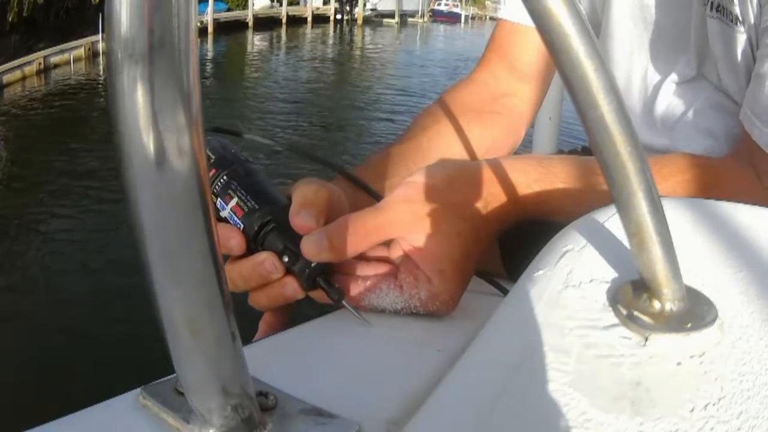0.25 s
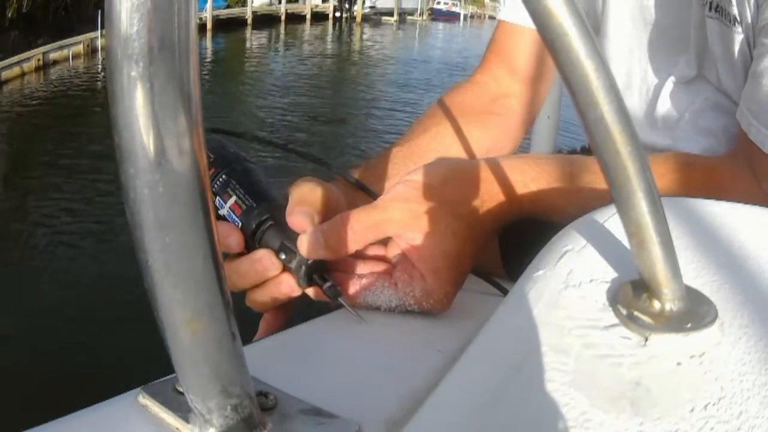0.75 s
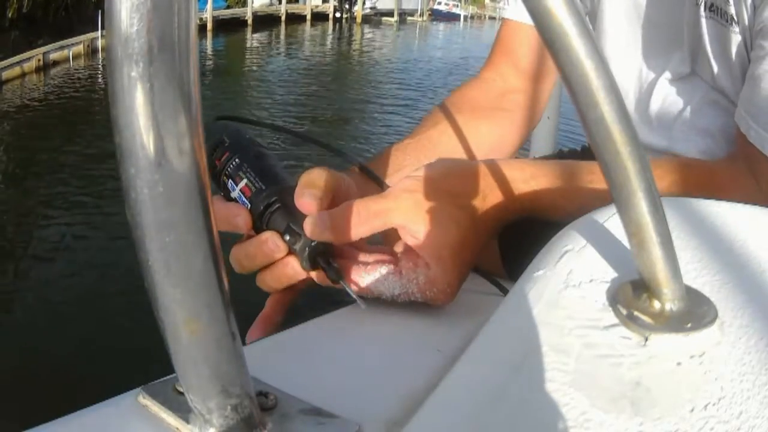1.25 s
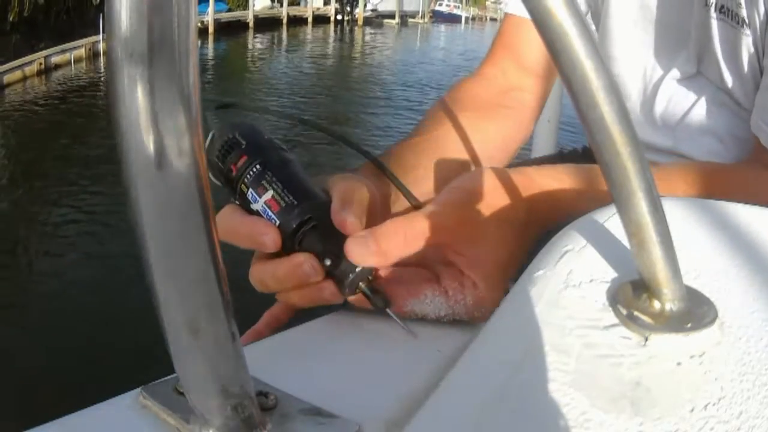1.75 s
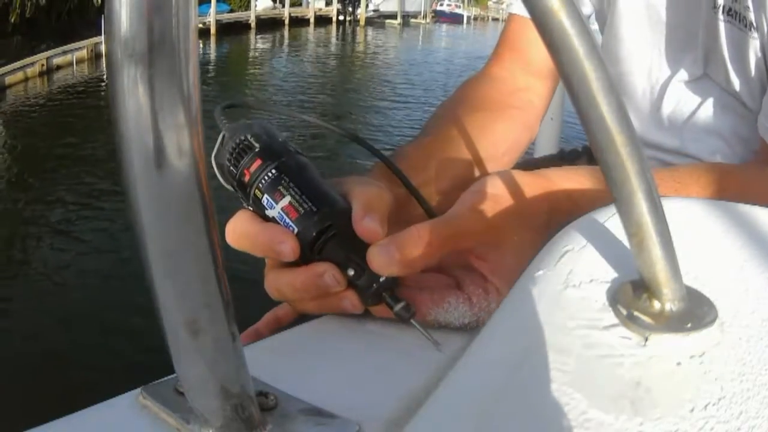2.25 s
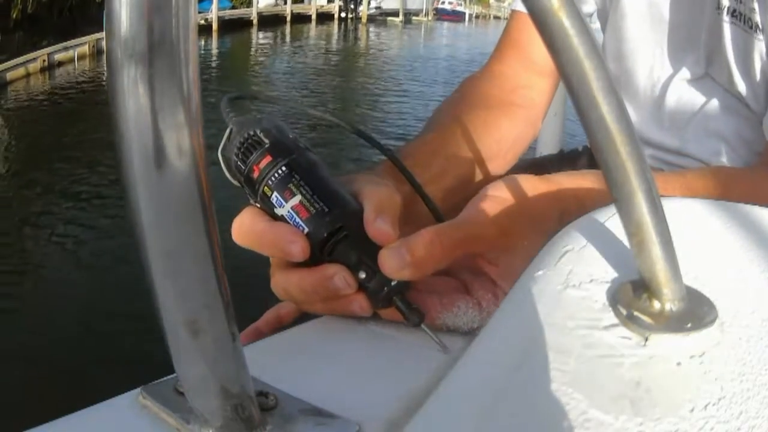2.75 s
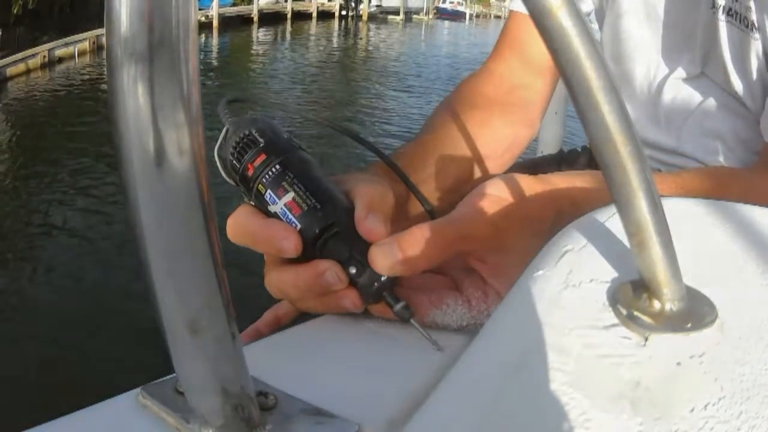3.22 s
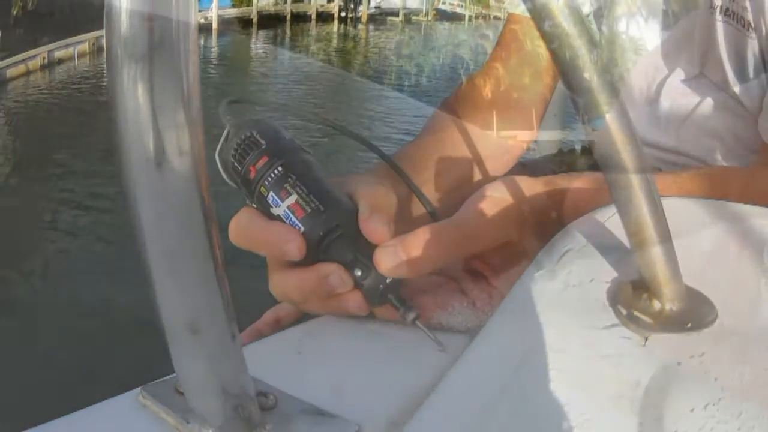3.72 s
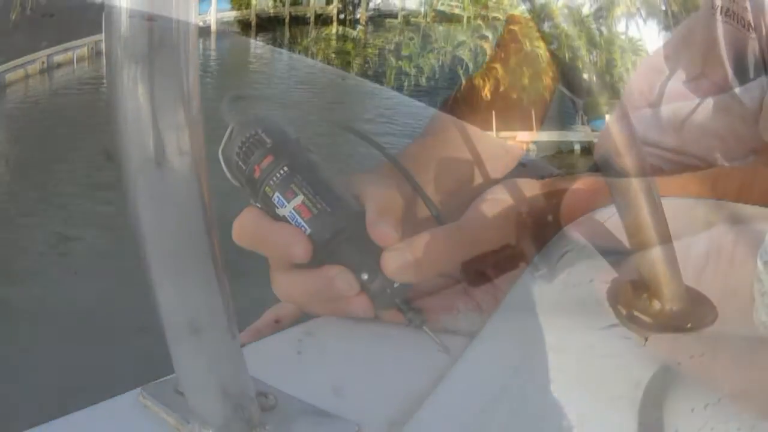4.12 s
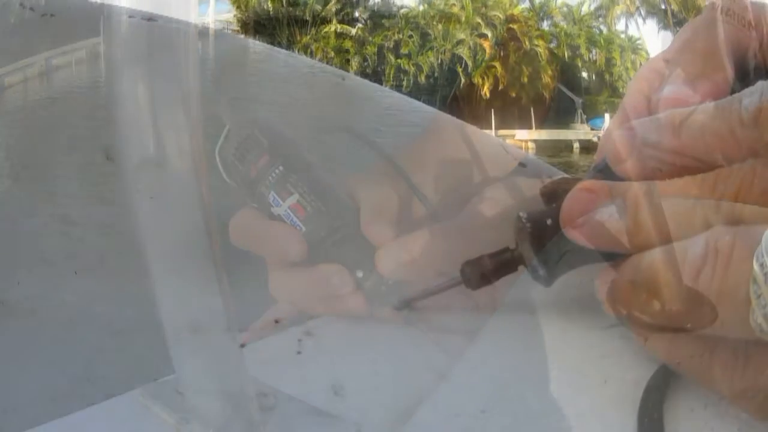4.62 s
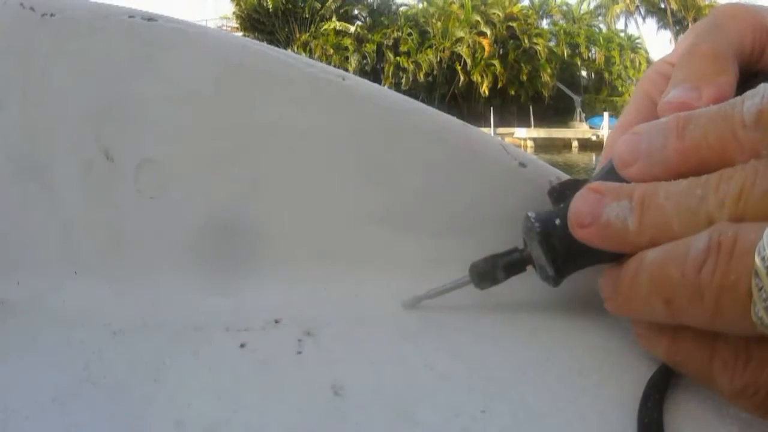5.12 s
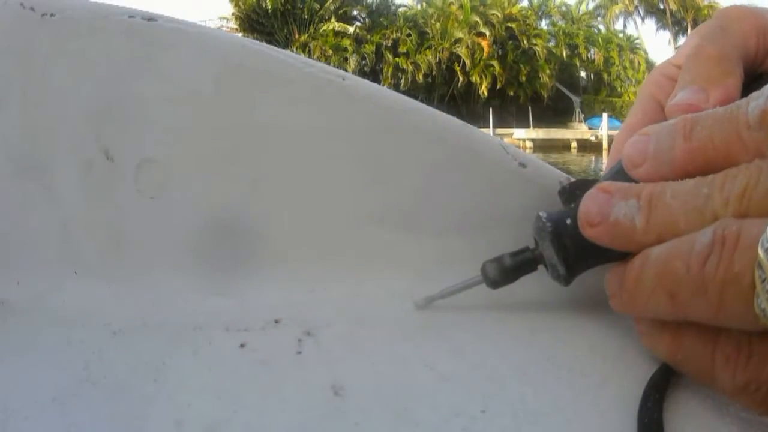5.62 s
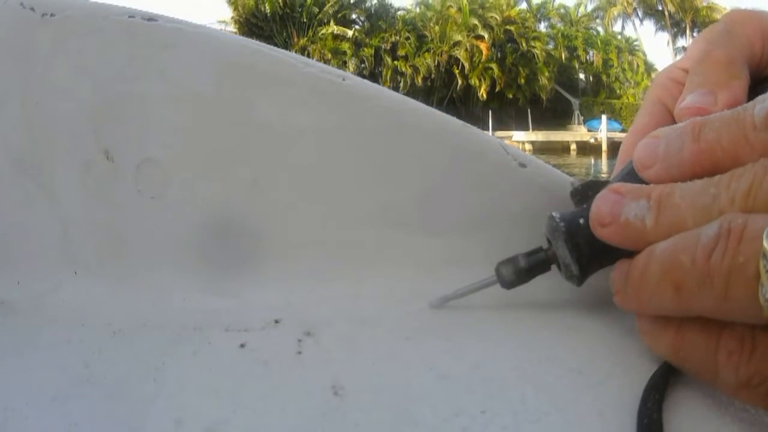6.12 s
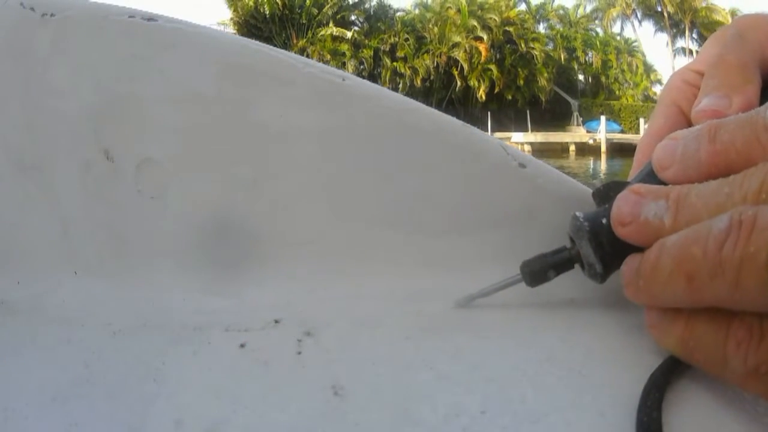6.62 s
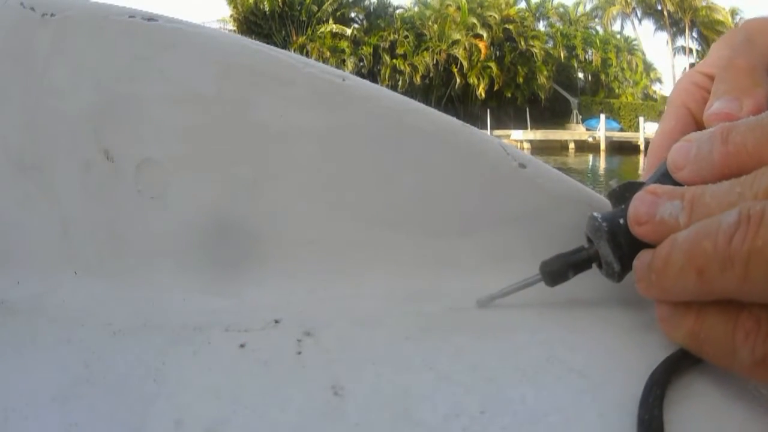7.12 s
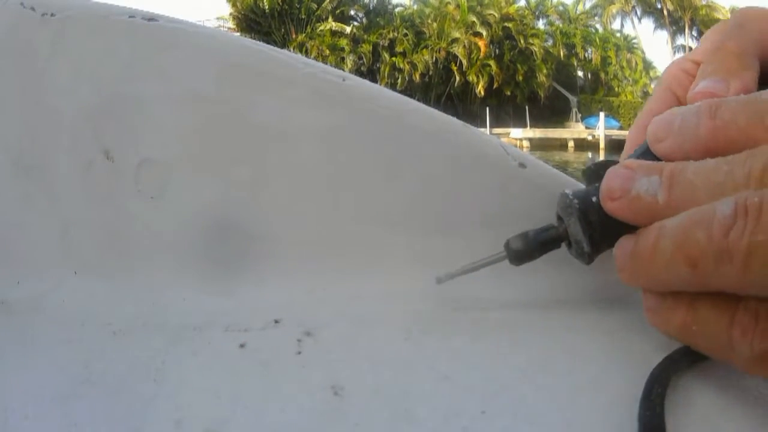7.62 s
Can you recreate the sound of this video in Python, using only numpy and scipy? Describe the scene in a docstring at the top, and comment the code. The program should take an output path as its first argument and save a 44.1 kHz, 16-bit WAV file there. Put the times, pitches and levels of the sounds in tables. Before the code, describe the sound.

A small electric rotary tool buzzes through fiberglass outdoors, its freed whine climbing, then light touches crossfade into closer, harsher grinding that finally lifts off.

```python
"""A small mains-powered rotary tool grinds fiberglass on a boat deck, in the open air.
First comes a slow buzzing cut further off; when the burr lifts, the whine climbs, then lighter touches follow.
These fade out while closer, faster work fades in: the burr lands, digs in, judders, cuts evenly and lifts off.
The motor is made of tones and airy noise; each cut is a burst once a turn, split into panel, ring and rasp.
The hand presses and slips, the bit rings out when it catches, and the load drags the motor down."""
import sys
import numpy as np
from scipy import signal
from scipy.fft import rfft, irfft, next_fast_len
from scipy.io import wavfile
from scipy.ndimage import uniform_filter1d, map_coordinates

SR = 44100
rng = np.random.default_rng(int(sys.argv[2]) if len(sys.argv) > 2 else 0)


def waveform_to_disk(signal):
    """Save audio, clipped to [-1, 1], as 16-bit WAV at the path in sys.argv[1]."""
    frames = np.transpose(np.atleast_2d(signal))
    scaled = np.clip(frames, -1, 1) * 32767
    samples = np.round(scaled).astype(np.int16)
    wavfile.write(sys.argv[1], SR, samples)


N = 346626
TIME = np.arange(N) / SR

# the low rumble of tool and deck: (frequency [Hz], level [dB])
RUMBLE_SHAPE = [(15, -34), (25, -12), (113, -4.5), (179, -8), (233, -8), (279, -6), (700, -7), (910, -33),
                (1540, -120)]
# each time the burr works the fiberglass, by name: (start [s], end [s], attack [s], release [s],
# panel level [dB], ringing bit level [dB], rasp level [dB])
PASSES = { "first": (0, .62, 0, 0, -52.5, -51.5, -56.5), "easing": (.62, .89, 0, .025, -48.8, -58, -62),
          "graze": (2.675, 2.735, .025, .06, -57, -63, -61),
          "chatter": (2.8, 3.357, .16, 0, -51.6, -56, -56), "light": (3.52, 4.3, .5, 0, -50, -57.5, -57),
          "touch": (4.28, 4.585, .008, 0, -45.4, -48.5, -48), "dig": (4.585, 4.95, 0, 0, -44.6, -41.7, -45),
          "gouge": (4.95, 5.2, 0, 0, -44.2, -40, -43.5), "judder": (5.2, 5.98, 0, 0, -43.8, -43, -45),
          "buzz": (5.98, 6.26, 0, 0, -43.8, -43, -44), "steady": (6.26, 7.19, 0, 0, -43.4, -46, -45.5),
          "leaving": (7.19, 7.492, 0, 0, -42.4, -44, -45.5), }


def amp(db):
    """Turn decibels into a gain."""
    return 10 ** (np.asarray(db) / 20)


def unit(x):
    """Scale x to an average (rms) level of 1."""
    return x / np.sqrt(np.mean(x ** 2) + 1e-20)


def levelled(x):
    """Take the slow loudness drift out of x, using its average level over 67 ms."""
    power = uniform_filter1d(x ** 2, size=2940)
    return x / np.sqrt(np.abs(power) + 1e-12)


def wobble(rate, t=TIME):
    """Draw a random curve: this many random points a second, joined by straight lines."""
    knots = rng.standard_normal(int(N / SR * rate) + 2)
    return np.interp(t * rate, np.arange(len(knots)), knots)


def swell(t, peak_s, length_s):
    """Rise smoothly to 1 at the peak and fall back, staying above one half for the given length."""
    return 2 ** -(2 * (t - peak_s) / length_s) ** 2


def swells(t, rows):
    """Add up the rows' swells, once for each column after (peak, length)."""
    rows = np.array(rows)
    curves = np.array([swell(t, peak_s, length_s) for peak_s, length_s in rows[:, :2]])
    return rows[:, 2:].T @ curves


def pulse(angle, focus):
    """Make a bump once a cycle, narrower as focus grows."""
    return np.exp(focus * (np.cos(angle) - 1))


def filtered(x, response):
    """Multiply the spectrum of x by a gain that depends on frequency."""
    size = next_fast_len(len(x) + 8192)
    spectrum = rfft(x, size) * response(np.fft.rfftfreq(size, 1 / SR))
    return irfft(spectrum, size)[:len(x)]


def coloured(x, points):
    """Filter x to a (frequency [Hz], level [dB]) shape without sounding ahead of it, at rms 1."""
    size = 4096
    hz, db = np.transpose(points)
    shape_db = np.interp(np.log(np.fft.rfftfreq(size, 1 / SR) + 1), np.log(hz + 1), db)
    # folding the cepstrum puts the filter's energy as early as it can be (minimum phase)
    cepstrum = irfft(np.log(amp(shape_db) + 1e-4))
    fold = np.r_[1, np.full(size // 2 - 1, 2), np.zeros(size // 2)]
    impulse = irfft(np.exp(rfft(cepstrum * fold)))
    return unit(signal.fftconvolve(x, impulse)[:len(x)])


def open_air():
    """The faint murmur of the open air is steady low noise."""
    # (frequency [Hz], level [dB])
    murmur_shape = [(12, -33), (20, -2.5), (123, -1.5), (330, -7), (468, -5.5), (507, -5), (900, -20.5),
                    (1170, -36), (1980, -120)]
    return amp(-77) * coloured(rng.standard_normal(N), murmur_shape)


def mains_angle(t=TIME):
    """The motor's current peaks twice in each mains cycle, so 120 times a second."""
    return 2 * np.pi * 120 * t + np.pi


def shaft(targets, unsteady=0.000877):
    """The shaft's speed eases toward each new target and trembles slightly; this gives its angle."""
    inertia_s = .6  # how slowly the speed answers a change of load
    change_s, target = np.transpose(targets)
    speed = target[0]
    for at, step in zip(change_s[1:], np.diff(target)):
        speed = speed + step * (1 - np.exp(-np.maximum(TIME - at, 0) / inertia_s))
    return 2 * np.pi * np.cumsum(speed * (1 + unsteady * wobble(35))) / SR


def motor(angle, orders, whine_db, tones_db, air_db, rumble_db, focus, swing, overtone_db, air_focus):
    """The armature whines through the case in bursts of current; the fan adds tones and a rush of air."""
    # the ring of the motor case: (frequency [Hz], level [dB])
    case_shape = [(1500, -28), (2080, -18), (2310, 2.5), (2500, -7), (2750, -7.5), (3000, -14), (3300, -14),
                  (5000, -14)]
    # the rush of air: (frequency [Hz], level [dB])
    air_shape = [(290, -41), (500, -22.5), (830, -9.5), (1190, -2.5), (1670, -6.5), (1810, -2), (2810, -2),
                 (3740, -8), (4380, -7), (7450, -16), (8940, -23), (11200, -48), (14500, -69),
                 (22000, -120)]
    speed = np.gradient(angle) * SR / (2 * np.pi)  # turns a second
    # the fan grows with speed, 6 dB an octave around 183 turns a second
    fan_db = 6 * np.log2(speed / 183)
    # a motor gathering speed draws more current and whines louder: dB per (turn a second) each second
    rev_db = .055 * np.maximum(np.gradient(speed) * SR, 0)
    mains = mains_angle()
    armature = np.cos(16 * angle - swing * np.sin(mains)) + amp(overtone_db) * np.cos(18 * angle)
    whine = coloured(pulse(mains, focus) * armature, case_shape)
    tones = sum(amp(db + 3.6 * wobble(9)) * np.cos(round(k) * angle) for k, db in orders)
    air = coloured(rng.standard_normal(N) * pulse(mains, air_focus), air_shape)
    rumble = coloured(rng.standard_normal(N), RUMBLE_SHAPE)
    fan = amp(tones_db) * unit(tones) + amp(air_db) * air + amp(rumble_db) * rumble
    return amp(whine_db + rev_db) * whine + amp(fan_db) * fan


def labour(angle):
    """Under the first heavy cut the motor labours: its sixteenth harmonic sings, swelling once a turn."""
    # (time [s], level [dB])
    labour_level = [(0, -50), (.12, -52), (.2, -47.5), (.29, -48), (.44, -60), (.5, -54), (.6, -57),
                    (.8, -56), (.9, -75)]
    level_db = np.interp(TIME, *np.transpose(labour_level))
    whine = unit(pulse(angle, .7) * np.cos(16 * angle))
    return (TIME < PASSES["easing"][1]) * amp(level_db) * whine


def deck(angle, t, hum_db, judder_db, octave_db, rumble_db):
    """The pressed deck hums at one, one and a half and two times the shaft speed, and rumbles."""
    hum = 0
    for k, db in [(1, hum_db), (1.5, judder_db), (2, octave_db)]:
        hum = hum + amp(db + 1.5 * wobble(20, t)) * unit(np.cos(k * angle))
    return hum + amp(rumble_db) * coloured(rng.standard_normal(len(t)), RUMBLE_SHAPE)


def teeth(half_turn, t, focus, orders, change, uneven, count=120):
    """The teeth scrape out a similar burst every turn, which drifts (change: points a second) as they move."""
    # uneven: every second turn differs, which adds clean lines halfway between the shaft's harmonics
    pair = np.linspace(0, 2 * np.pi, 1024, endpoint=False)  # two turns of the shaft
    burst = rng.standard_normal(len(pair)) * pulse(2 * pair, focus) * pulse(pair, uneven)
    phases = np.angle(rfft(burst))
    lift_db = {2 * round(k): db for k, db in orders}
    step = 1 if uneven else 2
    scrape = 0
    for k in range(step, count, step):
        gain = uneven ** (k % 2) * amp(lift_db.get(k, 0) + 2.7 * wobble(change, t))
        scrape = scrape + gain * np.cos(k * half_turn + phases[k])
    return unit(scrape)


def rung(x, t60=0.017):
    """The treble of each bite rings on briefly in the tool and deck, dying by 60 dB in t60 seconds."""
    t = TIME[:2048]
    tail = rng.standard_normal(len(t)) * amp(-60 * t / t60)
    tail = filtered(tail / np.linalg.norm(tail), lambda hz: 1 - 1 / (1 + (hz / 2400) ** 6))
    return x + .5 * signal.fftconvolve(x, tail)[:len(x)]


def shifting(x):
    """The bit's ring shifts as the contact point moves: bright and dull patches, mostly in the treble."""
    patch_db, patch_hz, patch_s = 1.7, 450, .045  # depth, width and length of the patches
    size = 512
    hz, t, z = signal.stft(x, SR, nperseg=size)
    field = uniform_filter1d(rng.standard_normal(z.shape), round(patch_hz / hz[1]), axis=0)
    field = unit(uniform_filter1d(field, round(patch_s / t[1]), axis=1))
    treble = np.interp(hz, [1500, 3200, 6500, 9000], [.2, 1, 1, .3])[:, None]
    return signal.istft(z * amp(patch_db * treble * field), SR, nperseg=size)[1][:len(x)]


def whirled(x, half_turn, whirl):
    """The bent bit swings to the panel and away at half the shaft speed: its ring comes in rising chirps."""
    lag = whirl * .00005 * SR * np.cos(half_turn)  # samples; 50 microseconds at whirl 1
    moved = map_coordinates(x, [np.arange(len(x)) - lag], mode="nearest")
    return pulse(half_turn, whirl) * moved


def grind(angle, name, tone, focus, skip, throb, grit, dust, scatter_db, shake=0.031, whirl=0,
          change=8, uneven=0, orders=(), fade_in_s=.008, fade_out_s=.008):
    """In one pass the burr bites once a turn, and the panel, the ringing bit and the rasp answer."""
    # skip: it bites harder every second turn; throb: it follows the mains torque; whirl: the bit swings out
    # grit and dust: noise in each bite; long fades blend a pass into its neighbour

    # the hand presses harder: (time [s], length [s], panel lift [dB], rasp lift [dB])
    hand_presses = [(.175, .08, 5, 3), (.29, .03, 4, 3), (.35, .04, 4, 5), (.42, .04, 3, 4),
                    (.515, .08, 7, 3), (.79, .04, 2, 0), (3.93, .15, 1.5, 1.5), (4.327, .05, 0, 4),
                    (4.606, .04, 1, 4), (4.795, .07, 3.5, 4), (5.016, .04, 0, 4), (5.12, .05, 4, 6),
                    (5.27, .035, 2.5, 0), (5.344, .03, 2, 0), (5.448, .03, 2.5, 1), (5.982, .05, 0, 4),
                    (6.173, .025, 0, 5), (6.22, .035, 2, 6), (6.493, .06, 0, 2.5), (6.695, .05, 0, 4),
                    (6.92, .1, 1.5, 3.5), (7.12, .1, 2, 3), (7.43, .13, 0, 5)]
    # the bit catches and rings out: (time [s], length [s], lift [dB])
    bit_squeals = [(.041, .05, 4), (.197, .04, 9), (.272, .04, 10), (.32, .04, 7), (.41, .04, 8),
                   (.49, .09, 5), (.7, .06, 5), (2.947, .05, 4), (3.085, .03, 12), (3.136, .025, 6),
                   (3.9, .11, 10), (4.909, .04, 5), (5.076, .03, 7), (5.112, .025, 6), (5.344, .03, 5),
                   (5.399, .025, 5), (5.448, .025, 4), (5.506, .03, 3), (5.606, .04, 7), (5.83, .08, 7),
                   (5.926, .05, 7), (6.344, .05, 6.5), (6.597, .03, 3), (6.679, .04, 4), (6.86, .06, 3),
                   (7.261, .06, 2)]
    # the burr bounces and lands every second turn:
    # (time [s], length [s], panel lift [dB], how cleanly it skips [added to skip])
    burr_bounces = [(3.04, .05, 7.5, 1.1), (3.14, .025, 4, .2), (3.238, .045, 2.5, .9), (3.286, .028, 5, 1),
                    (3.34, .045, 1.5, 1.4), (4.17, .18, 1.5, .65), (4.52, .1, 1.5, .25), (5.09, .07, 0, .3)]
    # the burr loses its bite: (time [s], length [s], panel drop [dB], drop of ring and rasp [dB])
    burr_slips = [(.1, .04, 1, 5), (.64, .07, 4, 3.5), (.86, .06, 0, 3), (3.01, .03, 0, 3),
                  (3.18, .06, 2, 1), (4.665, .05, 1, 1), (5.228, .03, 1.5, 2), (6.285, .04, 0, 2.5),
                  (6.402, .05, 0, 3), (6.6, .08, 1, 1.5), (6.745, .035, 0, 4.5)]
    # the deck under each pass, by name: (once-a-turn hum [dB], judder hum [dB],
    # twice-a-turn hum [dB], rumble [dB])
    deck_levels = {"first": (-79, -100, -79, -71.5), "easing": (-82, -100, -84, -77),
                   "graze": (-95, -100, -100, -90), "chatter": (-88, -90, -92, -77),
                   "light": (-86, -92, -86, -72), "touch": (-71, -85, -63, -67.5),
                   "dig": (-65, -72, -82, -62), "gouge": (-69, -69, -82, -62),
                   "judder": (-69, -68, -76, -63.5), "buzz": (-66, -66, -72, -63.5),
                   "steady": (-62.5, -85, -69, -66.5), "leaving": (-62, -85, -69, -66)}

    start, end, attack, release, panel_db, ring_db, rasp_db = PASSES[name]
    on = (TIME > start - fade_in_s) & (TIME < end + fade_out_s)
    t = TIME[on]
    angle = angle[on] + shake * wobble(90, t)  # the bit trembles, so each bite comes a little early or late
    half_turn = angle / 2 + np.pi
    push_db, scrape_db = swells(t, hand_presses)
    squeal_db, = swells(t, bit_squeals)
    knock_db, bounce = swells(t, burr_bounces)
    lift_db, slip_db = swells(t, burr_slips)

    # breaking fibres add noise to each bite, fine dust mostly in the treble
    noise = rng.standard_normal(len(t))
    fibres = unit(pulse(angle, focus) * noise)
    fine_dust = unit(pulse(angle, focus / 2) * np.diff(noise, prepend=0))
    chips = grit * fibres + dust * fine_dust
    force = pulse(half_turn, skip * (1 + .5 * wobble(14, t)) + bounce)
    force = force * pulse(mains_angle(t), throb) * amp(scatter_db * wobble(110, t))
    bites = force * (teeth(half_turn, t, focus, orders, change, uneven) + chips)
    sound = coloured(shifting(rung(bites)), tone)

    # the panel speaks low, the bit rings in the middle, the rasp lies above
    panel = filtered(sound, lambda hz: 1 / (1 + (hz / 2800) ** 20))
    up_to_ring = filtered(sound, lambda hz: 1 / (1 + (hz / 4250) ** 20))
    ring = whirled(up_to_ring - panel, half_turn, whirl)
    rasp = whirled(sound - up_to_ring, half_turn, whirl)
    # each part also wavers by itself, 26 random points a second
    panel_level_db = panel_db + push_db + knock_db - lift_db + .7 * wobble(26, t)
    ring_level_db = ring_db + squeal_db - slip_db + wobble(26, t)
    rasp_level_db = rasp_db + scrape_db - slip_db + wobble(26, t)
    cut = amp(panel_level_db) * levelled(panel)
    cut = cut + amp(ring_level_db) * levelled(ring) + amp(rasp_level_db) * levelled(rasp)
    cut = cut + amp(push_db) * deck(angle, t, *deck_levels[name])

    # with an attack or release, the pass starts or ends softly, 9 dB below its full level
    softness = 0
    for inside, ramp in [(t - start, attack), (end - t, release)]:
        if ramp > 0:
            softness = softness + np.clip(1 - inside / ramp, 0, 1)
    edge = np.minimum((t - start) / fade_in_s, (end - t) / fade_out_s)
    contact = np.sin(np.pi / 2 * np.clip((1 + edge) / 2, 0, 1))
    out = np.zeros(N)
    out[on] = contact * amp(-9 * softness) * cut
    return out


def far_work():
    """A slow buzzing cut, a free run-up, then a bouncing touch and a light one, as the load sets the speed."""
    # the speed the shaft heads for, the first row its starting speed: (time [s], speed [turns a second])
    far_speed = [(0.0, 122.7), (0.0, 106.0), (0.402, 118.0), (0.652, 132.8), (0.924, 180.5), (1.9, 190.2),
                 (2.884, 170.5), (3.224, 186.5), (3.978, 167.3)]
    # running tones: (multiple of shaft speed [x], level [dB])
    far_orders = [(8, -5), (11, -5), (18, -2), (19, -4), (22, -9), (24, -10), (26, -10)]
    # turn harmonics that stand out as the burr bites: (multiple of shaft speed [x], lift [dB])
    first_orders = [(31, 5), (32, 8), (33, 8), (34, 5)]
    light_orders = [(8, 3), (9, 3), (18, 7)]
    # how the panel and tool ring at each spot: (frequency [Hz], level [dB])
    first_tone = [(300, -44), (550, -29.5), (800, -11), (1020, -0.5), (1450, -10), (1880, -5), (2250, -10),
                  (2950, -13), (3480, -14), (3780, -3), (4150, -10), (4600, -10), (5050, -19), (5650, -10),
                  (6200, -21.5), (9000, -29), (10400, -37), (11500, -60)]
    easing_tone = [(500, -33), (780, -9), (1050, 1), (1500, -11), (1900, -9), (2300, -15), (2700, -15),
                   (3500, -19), (3800, -11), (4100, -19), (4900, -26), (5450, -21), (6200, -30),
                   (10000, -42), (11500, -60)]
    chatter_tone = [(170, -33), (300, -24), (600, -23), (900, -12), (1200, 1), (1500, 0), (2000, -11),
                    (2950, -11), (3330, 1), (3750, -16), (4100, -12), (4450, -4.5), (5000, -15),
                    (5850, -12), (6500, -22), (10400, -35), (11500, -60)]
    light_tone = [(500, -20), (850, -11), (1200, 0), (1700, -2), (2150, -7), (2500, -1), (3000, -7),
                  (3350, -2), (3750, -9), (4200, -5), (4700, -5), (5100, -11), (7000, -16), (10400, -31),
                  (11500, -55)]

    angle = shaft(far_speed)
    running = motor(angle, far_orders, whine_db=-62.5, tones_db=-68.5, air_db=-62, rumble_db=-92,
                    focus=2.3, swing=.6, overtone_db=-10, air_focus=.25)
    first = grind(angle, "first", first_tone, focus=.8, skip=.03, throb=.04, grit=.34, dust=1.05,
                  scatter_db=1, shake=.014, orders=first_orders, fade_out_s=.1)
    easing = grind(angle, "easing", easing_tone, focus=.8, skip=.03, throb=.04, grit=.3, dust=1.15,
                   scatter_db=1, shake=.028, fade_in_s=.1)
    graze = grind(angle, "graze", light_tone, focus=1, skip=.2, throb=.1, grit=1.5, dust=1.5, scatter_db=1.5)
    chatter = grind(angle, "chatter", chatter_tone, focus=2, skip=.1, throb=.02, grit=.85, dust=1.1,
                    scatter_db=.8, shake=.042, change=45)
    light = grind(angle, "light", light_tone, focus=.35, skip=.05, throb=.1, grit=.75, dust=1,
                  scatter_db=.9, shake=.025, change=14, orders=light_orders)
    return running + labour(angle) + first + easing + graze + chatter + light


def near_work():
    """The burr lands, digs in with a whirl, gouges and judders, then settles into an even cut and lifts off."""
    # the speed the shaft heads for, the first row its starting speed: (time [s], speed [turns a second])
    near_speed = [(0.0, 251.4), (4.531, 227.0), (4.827, 215.8), (5.118, 198.0), (5.36, 192.2),
                  (5.93, 179.6), (6.225, 184.5), (6.58, 176.3), (7.289, 183.7), (7.452, 254.3)]
    # running tones: (multiple of shaft speed [x], level [dB])
    near_orders = [(8, -8), (10, -9), (16, -12), (18, 0), (19, -12)]
    # turn harmonics that stand out as the burr bites: (multiple of shaft speed [x], lift [dB])
    steady_orders = [(6, 5.5), (7, -12), (9, 2), (18, 6), (26, 3.5)]
    # how the panel and tool ring at each spot along the cut: (frequency [Hz], level [dB])
    touch_tone = [(290, -28.5), (548, -22), (819, -10.5), (1020, -2.5), (1450, -7), (1810, -1.5),
                  (2140, -8.5), (2570, -0.5), (2890, -6.5), (4670, -5.5), (6210, -11), (11200, -43),
                  (14500, -72), (22000, -120)]
    dig_tone = [(500, -20), (800, -16), (1000, -5), (1500, -9), (1950, -3), (2350, -10), (2650, -4),
                (3000, -12), (3450, -1), (4050, 4), (4600, -4), (5500, -9), (6150, -5), (6700, -20),
                (10000, -32), (11500, -50)]
    gouge_tone = [(500, -21), (800, -16), (1070, -5), (1400, -11), (1850, -2), (2200, -9), (3050, -11),
                  (3450, 3), (3950, 2), (4500, -7), (4950, -4), (6200, -9), (6700, -20), (10000, -30),
                  (11500, -52)]
    judder_tone = [(290, -45), (500, -24), (841, -16), (1150, -3), (1350, -12), (1680, -1), (2250, -12),
                   (2550, -9), (2950, -10), (3370, 9), (4100, -7), (4700, -5), (5600, -16), (6150, -16),
                   (7000, -23), (9920, -36), (11200, -50), (14500, -80)]
    steady_tone = [(200, -40), (400, -24), (560, -26), (750, -18), (900, -8.5), (1100, -3), (1280, -0.5),
                   (1460, -1.5), (1680, 2.5), (2100, -10), (2700, -6), (3400, -1.5), (3800, -7),
                   (4750, -2.5), (5300, -13), (6200, -17), (7500, -25.5), (10000, -39), (11500, -55)]
    leaving_tone = [(200, -40), (400, -25), (560, -27), (750, -18), (1080, 0), (1280, -10), (1620, 0),
                    (2100, -9), (2700, -8), (3300, -2), (3700, -5), (4200, -1), (4750, -1), (5300, -11),
                    (5750, -17), (6200, -13), (6800, -22), (10000, -33), (11500, -52)]

    angle = shaft(near_speed)
    running = motor(angle, near_orders, whine_db=-70, tones_db=-61.5, air_db=-57, rumble_db=-76.5,
                    focus=1.1, swing=.16, overtone_db=-15, air_focus=.069)
    touch = grind(angle, "touch", touch_tone, focus=.4, skip=.1, throb=.12, grit=.7, dust=1,
                  scatter_db=1, change=22, uneven=.3)
    dig = grind(angle, "dig", dig_tone, focus=.1, skip=.12, throb=.04, grit=.42, dust=.75,
                scatter_db=1, shake=.02, uneven=1, whirl=.42, change=16, fade_out_s=.03)
    gouge = grind(angle, "gouge", gouge_tone, focus=.15, skip=.1, throb=.04, grit=.5, dust=.85,
                  scatter_db=1, shake=.028, uneven=.9, whirl=.25, change=25, fade_in_s=.03, fade_out_s=.04)
    judder = grind(angle, "judder", judder_tone, focus=.45, skip=.08, throb=.12, grit=.5, dust=1.1,
                   scatter_db=1, shake=.036, uneven=.5, whirl=.15, change=20, fade_in_s=.04, fade_out_s=.05)
    buzz = grind(angle, "buzz", steady_tone, focus=.5, skip=.04, throb=.08, grit=.35, dust=1.15,
                 scatter_db=.9, uneven=.4, whirl=.3, fade_in_s=.05, fade_out_s=.13)
    steady = grind(angle, "steady", steady_tone, focus=.65, skip=.037, throb=.14, grit=.3, dust=1.25,
                   scatter_db=.7, shake=.024, change=12, orders=steady_orders, fade_in_s=.13, fade_out_s=.05)
    leaving = grind(angle, "leaving", leaving_tone, focus=.7, skip=.03, throb=.14, grit=.25, dust=1.25,
                    scatter_db=.6, shake=.025, change=14, orders=[(6, 3), (9, 2)], fade_in_s=.05)
    return running + touch + dig + gouge + judder + buzz + steady + leaving


def scene():
    """The far work gives way to the near work over the faint murmur of the open air."""
    fade_start_s, fade_length_s = 3.25, 1.7
    murmur = open_air()
    near = np.clip((TIME - fade_start_s) / fade_length_s, 0, 1)
    return ((1 - near) * far_work() + near * near_work() + murmur)[None]


def record(dry):
    """A steep filter removes nearly everything above 11305 Hz."""
    return filtered(dry[0], lambda hz: 1 / (1 + (hz / 11305) ** 80))[None]


dry = scene()
out = record(dry)
waveform_to_disk(out)
```